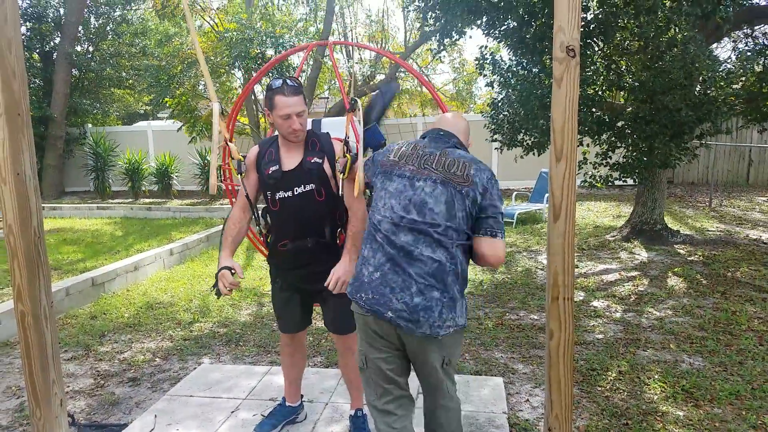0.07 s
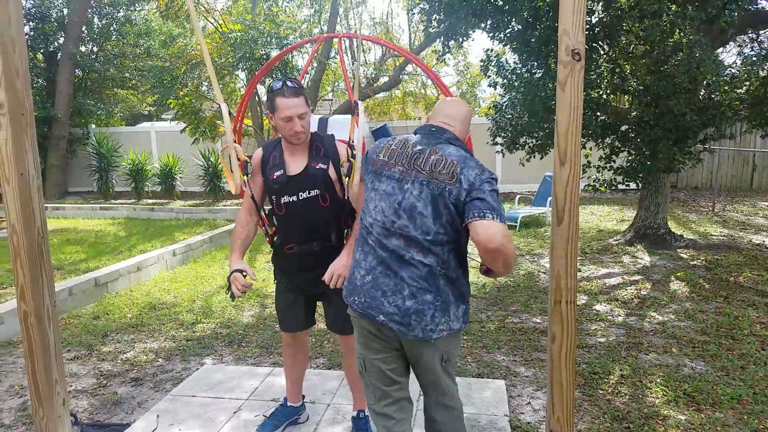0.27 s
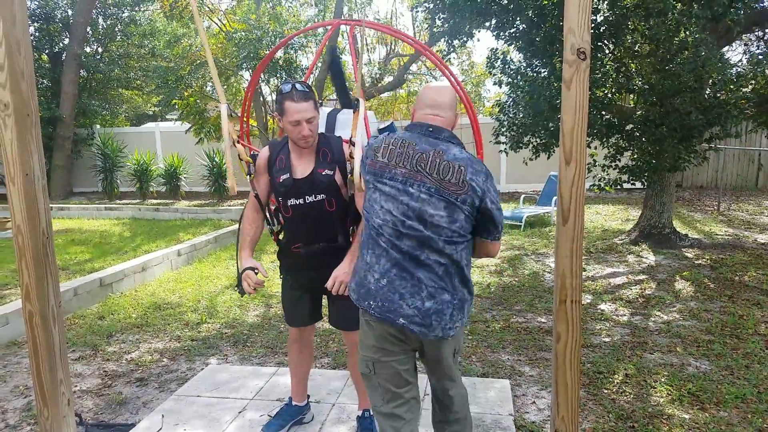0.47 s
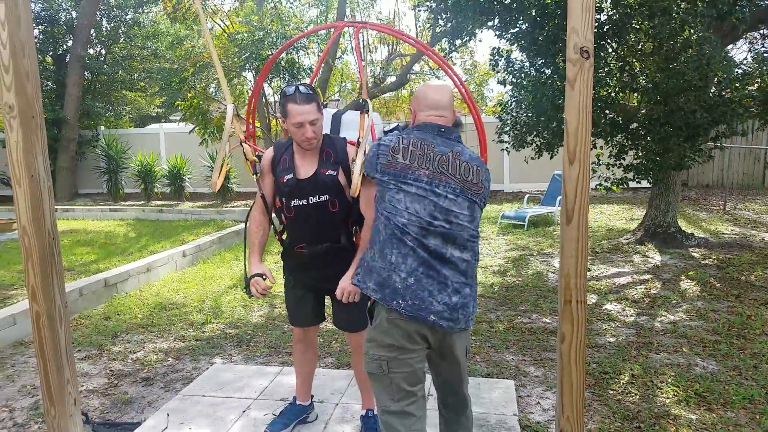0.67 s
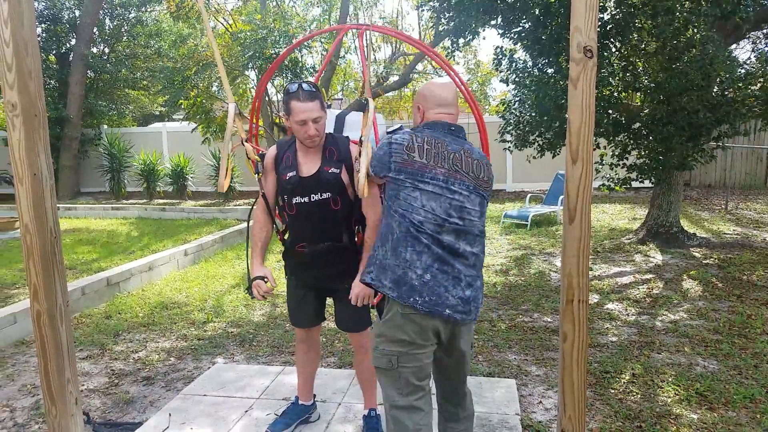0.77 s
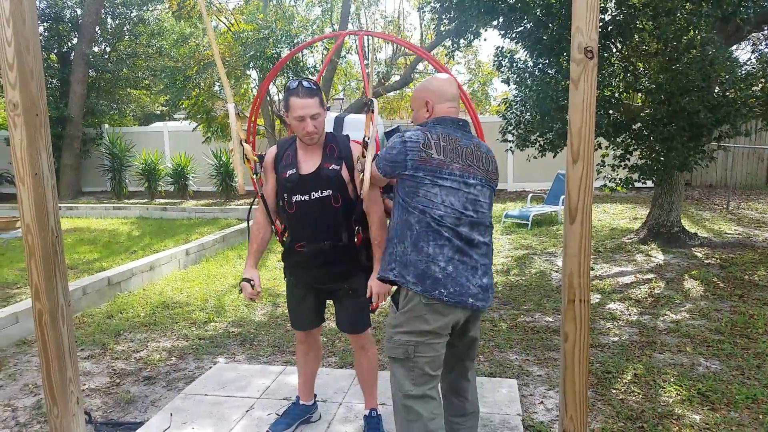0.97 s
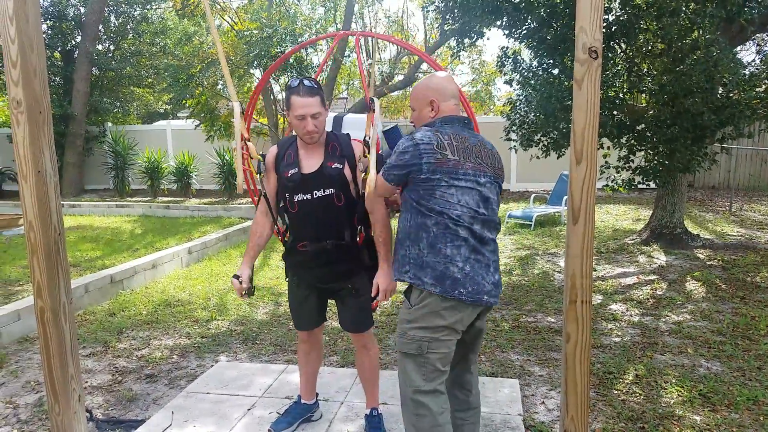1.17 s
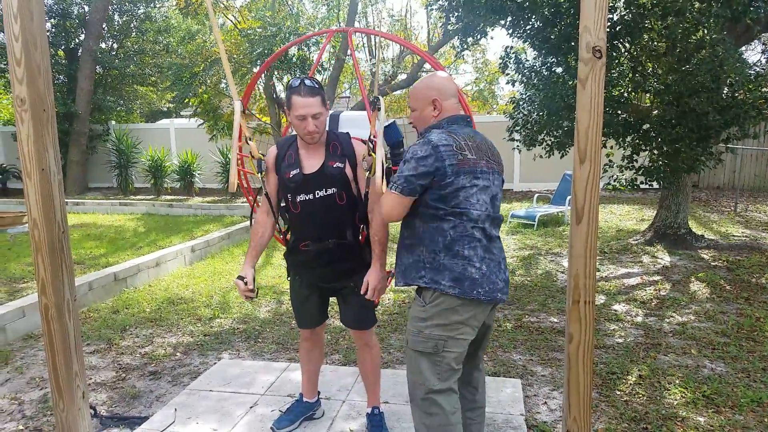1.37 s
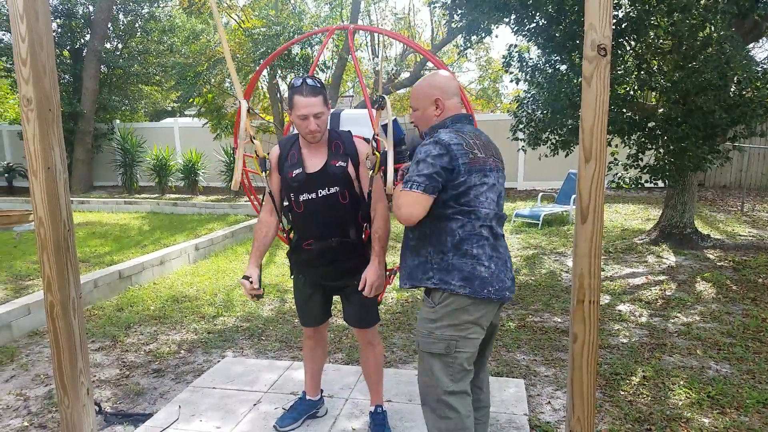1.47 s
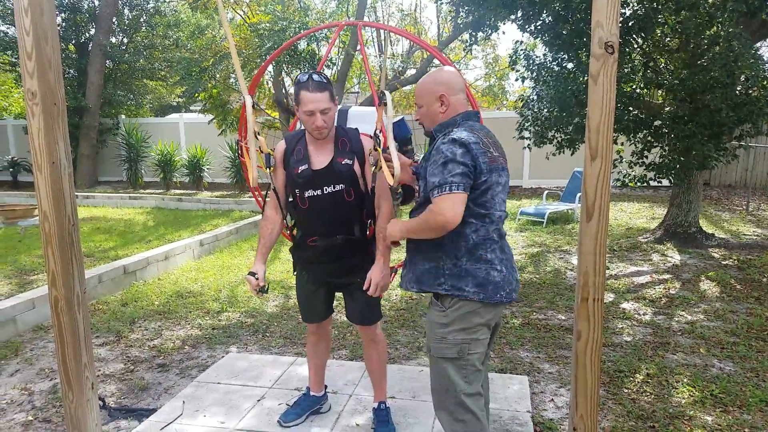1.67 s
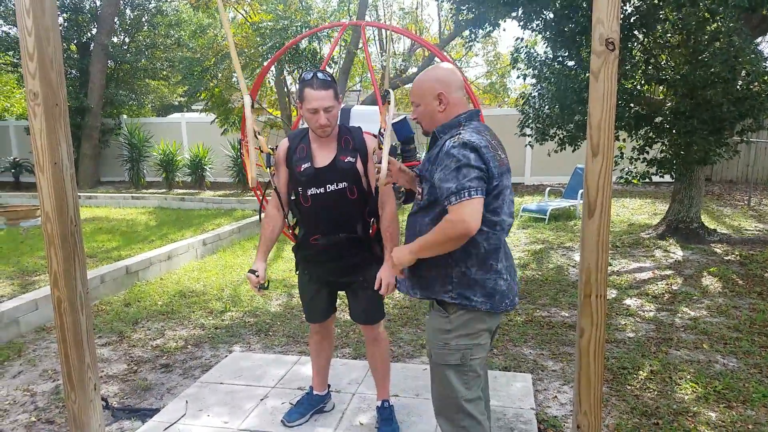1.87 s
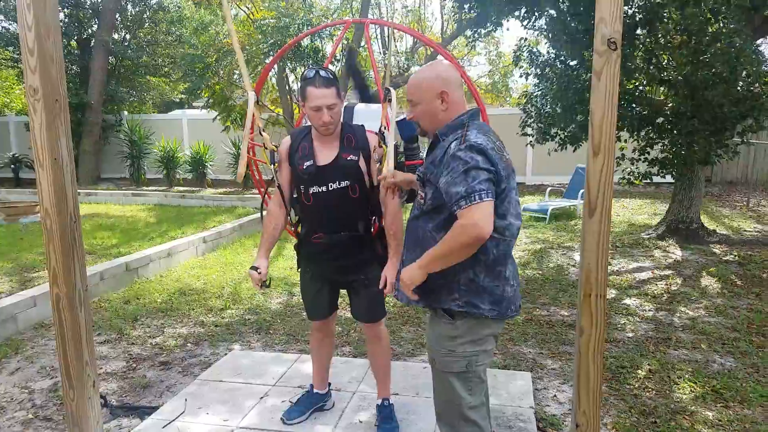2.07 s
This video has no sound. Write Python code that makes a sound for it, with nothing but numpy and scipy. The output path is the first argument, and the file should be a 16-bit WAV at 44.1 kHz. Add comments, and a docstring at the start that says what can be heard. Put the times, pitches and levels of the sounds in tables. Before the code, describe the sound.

Sputtering two-stroke motor heard from metres away on a phone outdoors: slow, irregular hollow exhaust pops quicken into a rough putter, with metallic rattles, low thumps, a steady airy wash and short yard reflections.

```python
"""A small two-stroke engine on a backpack frame sputters, catches and idles in a fenced yard, metres from a phone.
Uneven exhaust pops bark, swell the standing waves of the pipe and ring it; every crank turn thumps low.
Hard firings shake the frame, which rattles, clanks and hisses in shaped noise and metal modes.
Fence and posts scatter the sound over a steady engine wash, noise that throbs with the crank."""
import sys
import numpy as np
from scipy import signal
from scipy.fft import rfft, irfft, next_fast_len
from scipy.io import wavfile
from scipy.ndimage import uniform_filter1d

SR = 44100
rng = np.random.default_rng(int(sys.argv[2]) if len(sys.argv) > 2 else 0)


def put_to_file(sound):
    """Save the sound as 16-bit audio at rate SR, in the file named by the first command-line argument."""
    columns = np.atleast_2d(sound).T  # one column per channel
    safe = np.clip(columns, -1, 1)
    whole_steps = np.round(safe * 32767)
    wavfile.write(sys.argv[1], SR, whole_steps.astype(np.int16))


def decibels_to_gain(level_db):
    """Convert a level in decibels to a linear amplitude gain (20 dB per decade)."""
    exponent = np.asarray(level_db, float) / 20
    return 10 ** exponent


N = 93756
T = np.arange(N) / SR

# Crank position. Each row: time in seconds, turns done.
CRANK_TURNS = [(-.02, 0), (.522, 8), (.647, 10), (.815, 13), (1.177, 21), (1.25, 23), (1.437, 29),
               (1.618, 35), (1.687, 37), (2.15, 52)]
# Slow swell of the engine wash. Each row: time in seconds, level in dB.
WASH_SWELL = [(0, -32), (.55, -36), (1.35, -29), (2.13, -26.5)]


def curve(table):
    """Rows (s, value) joined by straight lines."""
    return np.interp(T, *np.array(table).T)


def unit(x):
    """Scale to rms 1."""
    return x / np.sqrt(np.mean(x ** 2))


def noise():
    """White noise."""
    return rng.standard_normal(N)


def colour(x, table):
    """Filter by (Hz, dB) points; outside them the ends hold."""
    n = next_fast_len(2 * N)
    hz, db = np.array(table).T
    bin_hz = np.arange(n // 2 + 1) * SR / n
    gain = decibels_to_gain(np.interp(np.log(bin_hz + 1), np.log(hz), db))
    return irfft(rfft(x, n) * gain, n)[:N]


def ring(x, hz, width_hz):
    """Two-pole resonance, gain 1 at its centre."""
    r = np.exp(-np.pi * width_hz / SR)
    gain = (1 - r * r) / 2
    return signal.lfilter([gain, 0, -gain], [1, -2 * r * np.cos(2 * np.pi * hz / SR), r * r], x)


def bank(x, table, width_hz):
    """Resonances (Hz, dB) side by side with alternate signs; rms near 1 on steady noise."""
    total = np.sqrt(sum(np.pi * width_hz / SR * decibels_to_gain(db) ** 2 for hz, db in table))
    rings = [(-1) ** k * decibels_to_gain(db) * ring(x, hz, width_hz) for k, (hz, db) in enumerate(table)]
    return sum(rings) / total


def modes(x, table, t60_s):
    """Metal modes with a common decay time, which sets their width."""
    return bank(x, table, np.log(1000) / np.pi / t60_s)


def clicks(times, db):
    """One-sample impulses."""
    out, at = np.zeros(N), (times * SR).astype(int)
    out[at[at < N]] = decibels_to_gain(db)[at < N]
    return out


def bursts(times, db, rise_s, fall_s):
    """Envelope: smooth rise, exponential fall, one for each event; powers add."""
    power = np.zeros(2 * N)
    for start, level, rise, fall in np.broadcast(times, db, rise_s, fall_s):
        u = T[:int((rise + 10 * fall) * SR)]
        at = int(start * SR)
        swell = np.sin(np.pi / 2 * np.minimum(u / rise, 1)) ** 2
        decay = np.exp(-np.maximum(u - rise, 0) / fall)
        power[at:at + len(u)] += (decibels_to_gain(level) * swell * decay) ** 2
    return np.sqrt(power[:N])


def exhaust():
    """Each puff barks, swells the pipe's standing waves and hisses through its resonances; puffs shorten with speed."""
    # Each row: time in seconds, pop level in dB, bark level re the pop in dB ahead of the final bark filter.
    pops = [(0.064, -9, -9.5), (0.244, -10.5, -18), (0.321, -19.5, -40), (0.39, -15.5, -14.5),
            (0.454, -9.5, -22), (0.526, -22, -22), (0.589, -6, -14.5), (0.653, -37.5, 3.5),
            (0.709, -8.5, -12), (0.764, -12.5, -15.5), (0.813, -14.5, -24), (0.867, -10, -8.5),
            (0.913, -12.5, -22.5), (0.965, -8, -18.5), (1.009, -12, -17), (1.05, -15.5, -16),
            (1.09, -8, -13.5), (1.175, -7.5, -10.5), (1.22, -19, -11.5), (1.249, -2, -15),
            (1.283, -6, -9.5), (1.316, -8.5, -11), (1.348, -4.5, -14), (1.374, -13, -3.5), (1.436, -7, -15),
            (1.494, -9.5, -10.5), (1.555, -8, -12.5), (1.62, -12.5, -6.5), (1.653, -13.5, -11),
            (1.688, -19, -10), (1.746, -5, -13.5), (1.806, -9, -10.5), (1.868, -7, -13.5),
            (1.932, -11.5, -9), (1.96, -13, -5.5), (2.025, -7, -14.5), (2.087, -5.5, -13),
            (2.118, -3.5, -16)]
    # Standing waves of the pipe, which waver. Each row: mean frequency in Hz, level in dB.
    standing = [(402, -7.5), (510, -12.5)]
    # Pipe resonances, then bark resonances. Each row: frequency in Hz, relative level in dB.
    pipe_rings = [(195, -10), (315, -1.5), (475, 1.5), (570, -1)]
    bark_rings = [(700, -1.5), (880, 1), (1100, -1.5), (1350, -5.5), (1600, -4.5)]
    pipe_width_hz, bark_width_hz = 56.7, 146
    hiss_db, hum_db = -9, -2  # hiss in the pipe; hum between pops re the wash
    wander_hz = 9.28  # rms
    slow_turns_per_s, slow_rise_s, slow_fall_s = 15.6, 0.014, 0.007  # puff lengths at this slow speed
    bark_lead_s = 0.0027

    s, db, bark_db = np.array(pops).T
    turns_per_s = (SR * np.gradient(curve(CRANK_TURNS)))[(s * SR).astype(int)]
    short = (slow_turns_per_s / turns_per_s) ** 0.24
    rise, fall = slow_rise_s * short, slow_fall_s * short

    def puff(level_db, lead_s):
        """Pressure envelope of all puffs, which swells before its loudest edge."""
        return bursts(s - rise / 2 - lead_s, level_db, rise, fall + lead_s)

    waves = 0
    for hz, level_db in standing:
        wavering_hz = hz + wander_hz * unit(uniform_filter1d(noise(), size=900))
        waves = waves + decibels_to_gain(level_db) * np.sin(2 * np.pi * np.cumsum(wavering_hz) / SR)
    hum = decibels_to_gain(curve(WASH_SWELL) + hum_db)
    tone = np.hypot(puff(db, 0), hum) * waves
    hiss = decibels_to_gain(hiss_db) * bank(puff(db, 0) * noise(), pipe_rings, pipe_width_hz)
    bark = bank(puff(db + bark_db, bark_lead_s) * noise(), bark_rings, bark_width_hz)
    return tone + hiss + colour(bark, [(1800, 3.0), (4000, -31)])


def thump():
    """One soft low pulse per crank turn; push and pull alternate through three resonances in series."""
    # Each row: time in seconds, running rms level of the thumps in dB.
    thump_level = [(0, -44), (.5, -38), (1.12, -50), (1.25, -38.5), (1.63, -35), (1.7, -61), (1.76, -36.5),
                   (1.93, -30.5), (2.0, -37), (2.04, -26)]
    hz, width_hz, lag_s = 70, 105, 0.0068
    s, turn = np.array(CRANK_TURNS).T
    at = np.interp(np.arange(1, turn[-1]), turn, s) + lag_s
    push, pull = at[::2], at[1::2]
    x = clicks(push, 0 * push) - clicks(pull, 0 * pull)
    for width in (width_hz, width_hz, 2 * width_hz):
        x = ring(x, hz, width)
    running_rms = np.sqrt(uniform_filter1d(x ** 2, size=6000))
    return x / running_rms * decibels_to_gain(curve(thump_level))


def frame():
    """Loose parts rattle in a burst with a longer tail, tubes ring differently at every blow, air hisses."""
    # Each row: time in seconds, clank level in dB, air hiss in dB re the clank, tube ring in dB re the clank,
    # all ahead of the layer levels below.
    clanks = [(0.0594, -11.5, -19, -18), (0.242, -27, -20.5, 1.5), (0.384, -40.5, -7.5, -6),
              (0.447, -35, -12, -2), (0.5838, -15.5, -19.5, -1), (0.705, -15, -18, -7.5),
              (0.759, -25.5, -19, -3), (0.862, -16, -18.5, -16.5), (.9576, -27, -16.5, 5),
              (1.085, -27.5, -12.5, 0), (1.169, -14.5, -20.5, -14), (1.2436, -16.5, -19, -11.5),
              (1.314, -21, -18.5, -6.5), (1.3704, -19.5, -20.5, -7), (1.4343, -17.5, -14.5, -5.5),
              (1.495, -20.5, -13, -6.5), (1.555, -23.5, -9.5, -19), (1.742, -22.5, -11, -12),
              (1.8027, -19.5, -15, -17), (1.8645, -19, -13, -10), (2.023, -20.5, -15.5, -19)]
    # Modes of the tubes, then of the starter. Each row: frequency in Hz, relative level in dB.
    tube_modes = [(3120, 1), (3245, 1.5), (3420, -4)]
    starter_modes = [(4160, 0)]
    # Spectra of the rattle, then of the air hiss. Each row: frequency in Hz, relative level in dB.
    rattle_colour = [(1400, -11), (3000, -2.5), (4500, -7), (6400, -5.5), (8300, -17.5), (13000, -33)]
    hiss_colour = [(8500, -14), (10800, -0.5), (15700, -4)]
    # Modes of the whole frame: a list of frequencies in Hz.
    frame_modes_hz = [2674, 4334, 4828, 6144]
    rise_s, fall_s, ring_fall_s = 0.01, 0.024, 0.015
    tail_s, tail_db = 0.12, -13.5
    rattle_db, air_db, tube_gain_db, starter_db = -9, 4, 1, -16.5
    tube_t60_s, starter_t60_s, frame_t60_s = 0.028, 0.03, 0.047
    frame_db, scatter_db = -22.5, 4  # mean level of a frame mode; its spread from blow to blow

    s, db, hiss_db, tube_db = np.array(clanks).T
    s = s - .004  # the shake builds before its loudest edge

    def shake(level_db):
        """Blow and its longer tail."""
        blow = bursts(s, level_db, rise_s, fall_s)
        return np.hypot(blow, bursts(s, level_db + tail_db, rise_s, tail_s))

    def grain():
        """Noise whose level flutters by 1.98 dB rms."""
        return noise() * decibels_to_gain(1.98 * unit(uniform_filter1d(noise(), size=90)))

    def grain_band(table):
        """Coloured grain, cut steeply below the first row."""
        return unit(colour(grain(), [(table[0][0] / 2, -50)] + table))

    rattle = decibels_to_gain(rattle_db) * shake(db) * grain_band(rattle_colour)
    hiss = decibels_to_gain(air_db) * shake(db + hiss_db) * grain_band(hiss_colour)
    tube_blows = bursts(s, db + tube_db, rise_s, ring_fall_s) * grain()
    tubes = decibels_to_gain(tube_gain_db) * modes(tube_blows, tube_modes, tube_t60_s)
    first_blow = bursts(s[:1], starter_db, rise_s, ring_fall_s) * grain()  # only this one strikes the starter
    starter = modes(first_blow, starter_modes, starter_t60_s)
    share_db = frame_db + scatter_db * rng.standard_normal((len(frame_modes_hz), len(s)))
    clang = sum(modes(shake(db + share) * grain(), [(hz, 0)], frame_t60_s)
                for hz, share in zip(frame_modes_hz, share_db))
    return rattle + hiss + tubes + starter + clang


def wash():
    """Steady roar of fan, intake and yard: coloured noise, throbbing with the crank."""
    # Each row: frequency in Hz, relative level in dB per Hz.
    wash_colour = [(18, -47), (40, -10), (90, -1.5), (160, -15), (390, 0), (800, -16), (3160, -25),
                   (8320, -41.5), (12500, -38.5)]
    throb_db = 2.15 * np.cos(2 * np.pi * curve(CRANK_TURNS) - .8)
    return unit(colour(noise(), wash_colour)) * decibels_to_gain(curve(WASH_SWELL) + throb_db)


def tail(t60_s, start_s):
    """Scattered reflections as decaying noise of energy 1."""
    t = T[:SR // 2]
    reflections = rng.standard_normal(len(t)) * decibels_to_gain(-60 * t / t60_s) * (t > start_s)
    return unit(reflections) / np.sqrt(len(t))


def scene():
    """Engine and yard; scattering near the phone widens the treble, and the frame rattles differently to each side."""
    # Filter on the side signal. Each row: frequency in Hz, gain in dB.
    side_colour = [(60, -23), (300, -13), (1000, -4), (4000, .8)]
    # Balance of the microphones. Each row: frequency in Hz, left re right in dB.
    balance = [(100, -2.5), (350, -3.5), (1200, -1)]
    yard_t60_s, yard_start_s, yard_db = 0.52, 0.0098, -10.5
    pipe = exhaust()
    near = pipe + frame()
    yard = decibels_to_gain(yard_db) * signal.fftconvolve(near, tail(yard_t60_s, yard_start_s))[:N]
    mid = near + yard + thump() + wash()
    scattered = signal.fftconvolve(pipe + frame(), tail(0.096, 0))[:N]
    side = colour(scattered + wash(), side_colour)
    left_half = [(hz, db / 2) for hz, db in balance]
    right_half = [(hz, -db / 2) for hz, db in balance]
    return np.array([colour(mid + side, left_half), colour(mid - side, right_half)])


def roll_off(x):
    """The treble ends steeply here."""
    return signal.sosfilt(signal.butter(12, 15730, fs=SR, output="sos"), x)


def record(dry):
    """The phone rounds the loudest peaks softly."""
    mix = np.tanh(dry)
    return roll_off(mix)


dry = scene()
out = record(dry)
put_to_file(out)
```